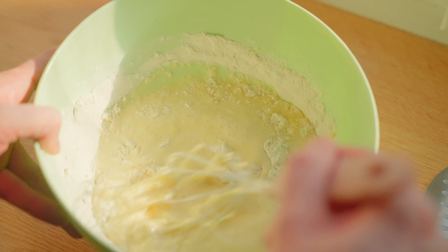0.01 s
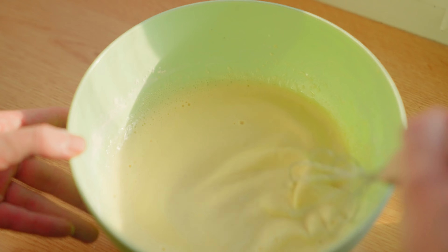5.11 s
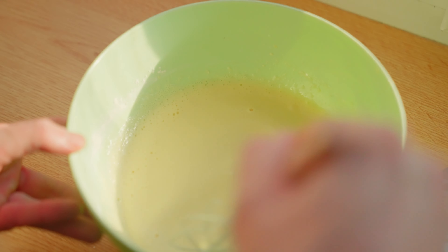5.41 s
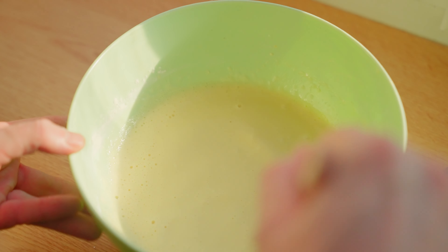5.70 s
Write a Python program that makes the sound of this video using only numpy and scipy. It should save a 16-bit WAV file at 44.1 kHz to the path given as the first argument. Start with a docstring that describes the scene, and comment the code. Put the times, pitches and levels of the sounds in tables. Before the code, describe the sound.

A wire whisk beats batter in a hand-held plastic bowl, heard close in a small kitchen with faint room tone and very little echo. From the start, the wires knock and chatter against the side about five times a second, with wet swishes, soft gulps and a few tiny pops around 1 second. From about 1.6 to 2.5 seconds the knocks grow firmer and short scrapes come between them. After a brief hesitation, the whisking resumes at 2.8 seconds, heavier and less even: the loaded bowl gives dull, low thumps, the batter sloshes more, and single wires tick along the wall. The strokes thin out between 4.3 and 5 seconds, with a strong thump and a couple of wet pops around 4.6 to 4.7. The sharpest knock lands at about 5.3 seconds, followed by light, quick taps and squelches until nearly 6 seconds.

```python
"""A small kitchen: a wire whisk beats batter in a hand-held plastic bowl, about five strokes a second.
The wires knock and chatter on the wall and scrape along it; heavy strokes make the loaded bowl thump.
The wet batter swishes ahead of each stroke, then gulps, squelches and pops as the wires pull through.
Worktop and walls add a short tail over a faint room tone."""
import sys
import numpy as np
from scipy import signal
from scipy.fft import rfft, irfft, next_fast_len
from scipy.io import wavfile

SR = 44100
rng = np.random.default_rng(int(sys.argv[2]) if len(sys.argv) > 2 else 0)


def pcm_store(signal):
    """Save signal as 16-bit PCM."""
    levels = np.round(np.clip(np.atleast_2d(signal), -1, 1) * 32767)
    wavfile.write(sys.argv[1], SR, levels.astype(np.int16).T)


N = 262373


def from_db(db):
    """Decibels to gain."""
    return 10 ** (np.asarray(db) / 20)


def rms_one(x, first_s=None):
    """Scale to rms 1, overall or over the first first_s."""
    part = x if first_s is None else x[:int(first_s * SR)]
    return x / np.sqrt(np.mean(part ** 2) + 1e-20)


def seconds(length_s):
    """Time axis."""
    return np.arange(int(length_s * SR)) / SR


def decay(t, t60_s):
    """Envelope falling 60 dB in t60_s."""
    return from_db(-60 * t / t60_s)


def add(track, start_s, sound):
    """Mix a sound into the track."""
    i = max(int(start_s * SR), 0)
    track[i:i + len(sound)] += sound[:max(N - i, 0)]


def above(x, hz):
    """Second-order high-pass."""
    return signal.sosfilt(signal.butter(2, hz, "high", fs=SR, output="sos"), x)


def near(hz, centre_hz, octaves):
    """Bell curve over log pitch, 1 at the centre."""
    return np.exp(-(np.log2(hz / centre_hz) / octaves) ** 2)


def coloured(x, spectrum, patchy_db=0):
    """Shape noise to a spectrum, with optional random peaks and dips; rms 1."""
    hz, db = np.transpose(spectrum)
    size = next_fast_len(len(x))
    bins_hz = np.maximum(np.fft.rfftfreq(size, 1 / SR), 1)
    patches_db = patchy_db * np.interp(bins_hz, np.linspace(0, SR / 2, 45), rng.standard_normal(45))
    gain = from_db(np.interp(np.log(bins_hz), np.log(hz), db) + patches_db)
    return rms_one(irfft(rfft(x, size) * gain, size)[:len(x)])


def ring(force, hz, t60_s):
    """Resonator: a unit click starts a decaying sine of height 1."""
    r, w = from_db(-60 / (t60_s * SR)), 2 * np.pi * min(hz, 16000) / SR
    return signal.lfilter([0, np.sin(w)], [1, -2 * r * np.cos(w), r * r], force + 1e-18)


def grains(per_s, spread_db, size):
    """Random clicks of uneven size and sign."""
    heights = from_db(spread_db * np.minimum(rng.exponential(1, size), 4)) * rng.choice([-1, 1], size)
    return heights * (rng.random(size) < per_s / SR)


def sinking(hz, t, sag_per_s=1.4):
    """Falling sine, passing through hz at 15 ms."""
    return np.sin(2 * np.pi * np.cumsum(hz * np.exp(-sag_per_s * (t - .015))) / SR)


# room tone spectrum: freq_hz, gain_db
ROOM_SPECTRUM = [(25, -43), (50, 10.5), (80, 2), (140, 10.5), (250, 2), (500, -4), (1600, -22),
                 (16000, -28.5)]
def room_tone(level_db=-69.5):
    """Faint, steady, low noise."""
    return above(from_db(level_db) * coloured(rng.standard_normal(N), ROOM_SPECTRUM), 30)


def kitchen(x, t60_s=0.16, wet_db=-12, delay_s=0.0062, build_s=0.00089):
    """Worktop and walls return a short, dense tail."""
    t = seconds(.45)
    onset = np.clip((t - delay_s) / build_s, 0, 1)
    tail = above(rng.standard_normal(len(t)), 150) * decay(t, t60_s) * onset
    return x + from_db(wet_db) * signal.fftconvolve(x, tail / np.linalg.norm(tail))[:N]


def bowl_hollow(x, t60_s=0.014, wet_db=-3):
    """Echoes inside the bowl smear and colour small sounds."""
    t, wet = seconds(.05), from_db(wet_db)
    echoes = above(rng.standard_normal(len(t)), 500) * decay(t, t60_s)
    return (x + wet * signal.fftconvolve(x, echoes / np.linalg.norm(echoes))[:N]) / np.hypot(1, wet)


def pocket(hz, cycles, roughness=1.3):
    """A tiny air pocket opens and rings, roughened by its tearing film."""
    turns = seconds(cycles / hz) * hz
    opening = 1 - np.exp(-turns)
    tearing = 1 + roughness * np.sqrt(hz / SR) * rng.standard_normal(len(turns))
    return np.sin(2 * np.pi * turns) * tearing * opening * from_db(-60 * turns / cycles)


def crackle(per_s=700, low_hz=2300, high_hz=13600, fall_octaves_per_s=.17, spread_db=5):
    """Lone pockets burst at random, duller as the batter loosens; rms 1."""
    out = np.zeros(N)
    for when, pitch, size in rng.random((int(per_s * N / SR), 3)):
        start_s = when * N / SR
        hz = low_hz * (high_hz / low_hz) ** pitch * 2 ** (-fall_octaves_per_s * start_s)
        gain = from_db(spread_db * min(-np.log(1 - size), 3)) * np.sqrt(hz)
        add(out, start_s, gain * pocket(hz, cycles=9))
    return rms_one(out)


def bubble_swarm(per_s, spread_db, low_hz, high_hz, cycles, count):
    """Random bubbles, each ringing briefly at one of count pitches; rms 1."""
    bursts, slot = grains(per_s, spread_db, N), rng.integers(0, count, N)
    pitches_hz = np.geomspace(low_hz, high_hz, count)
    return rms_one(sum(ring(bursts * (slot == k), hz, cycles / hz) for k, hz in enumerate(pitches_hz)))


def stroke_swell(t, lag_s, half_width_s, rest_db, gap_s=0.11):
    """Gain of 1 at each stroke, rest_db between; a knock after a pause opens a stroke."""
    knock_s = np.transpose(KNOCKS)[0]
    stroke_s = knock_s[np.diff(knock_s, prepend=-1) > gap_s]
    distance_s = np.min([np.abs(t - s - lag_s) for s in stroke_s], axis=0)
    return from_db(rest_db * (1 - np.exp(-(distance_s / half_width_s) ** 2)))


# churning envelope: time_s, slosh_db, fizz_db
CHURN = [(0.0, -62.5, -86), (0.64, -55.5, -75), (1.47, -58.5, -71.5), (1.87, -62, -80.5), (2.46, -62, -86),
         (2.659, -100, -108), (2.88, -49, -80), (3.03, -48.5, -76), (3.68, -46, -67), (4.11, -49.5, -71),
         (4.32, -70, -84), (5.04, -71.5, -82.5), (5.351, -76, -69.5), (5.95, -58, -68.5)]
# hiss of tearing films: freq_hz, gain_db
FIZZ_SPECTRUM = [(2000, -16.5), (3500, 9), (6000, 7), (9000, 8), (12000, 3.5), (16000, -11)]
def batter(slosh_trim_db=-7.5, fizz_trim_db=4):
    """Batter sloshes most just after a stroke lands; sticky films tear as the whisk sweeps in."""
    t = np.arange(N) / SR
    time_s, slosh_db, fizz_db = np.transpose(CHURN)
    push = stroke_swell(t, lag_s=0.0082, half_width_s=0.052, rest_db=-8.5)
    swish = stroke_swell(t, lag_s=-0.01, half_width_s=0.041, rest_db=-6.5)
    large = bubble_swarm(per_s=43, spread_db=3, low_hz=122, high_hz=380, cycles=6.6, count=10)
    small = bubble_swarm(per_s=900, spread_db=6, low_hz=450, high_hz=3250, cycles=19, count=24)
    films = crackle() + from_db(-8) * above(coloured(rng.standard_normal(N), FIZZ_SPECTRUM), 1600)
    slosh = (from_db(-3) * large + small) * from_db(np.interp(t, time_s, slosh_db) + slosh_trim_db)
    fizz = films * from_db(np.interp(t, time_s, fizz_db) + fizz_trim_db)
    return slosh * push + fizz * swish


def squelch(length_s, centre_hz, pockets_per_s=1000, spread_octaves=0.6, spread_db=6):
    """A quick run of uneven pockets around one pitch; rms about 1 over its length."""
    out, count = np.zeros(int(.2 * SR)), 200
    starts_s = (np.arange(count) + rng.random(count)) / pockets_per_s
    for start_s, (pitch, size) in zip(starts_s, rng.standard_normal((count, 2))):
        if start_s < length_s:
            hz = np.clip(centre_hz * 2 ** (spread_octaves * pitch), 600, 15000)
            add(out, start_s, from_db(spread_db * size) * pocket(hz, cycles=17))
    return rms_one(out) * np.sqrt(length_s * SR / len(out))


# pulls through the batter: start_s, length_s, level_db, pitch_hz
SQUELCHES = [(0.068, 0.03, -62.5, 4600), (0.291, 0.048, -62.5, 7100), (0.489, 0.062, -66, 6300),
             (0.698, 0.027, -54.5, 5260), (0.918, 0.016, -57, 8850), (1.116, 0.042, -58, 7750),
             (1.338, 0.011, -56, 11800), (1.376, 0.026, -57.5, 4450), (2.568, 0.042, -55.5, 1660),
             (3.341, 0.061, -62, 1310), (3.629, 0.078, -55.5, 2300), (3.934, 0.061, -58.5, 2010),
             (4.674, 0.025, -58, 4030), (5.638, 0.04, -54, 2210), (5.782, 0.053, -58.5, 1890)]
def squelches(plough_s=0.018, plough_db=-55):
    """Wires drag through the batter, and plough into it ahead of each knock."""
    out = np.zeros(N)
    for start_s, length_s, level_db, pitch_hz in SQUELCHES:
        add(out, start_s, from_db(level_db) * squelch(length_s, pitch_hz))
    for start_s, level_db, spot_hz, *_ in KNOCKS:
        add(out, start_s - plough_s, from_db(level_db + plough_db) * squelch(plough_s, spot_hz))
    return out


# large pockets closing: start_s, level_db, pitch_hz
GULPS = [(0.163, -37, 281), (0.384, -33, 310), (0.42, -39.5, 344), (2.424, -39, 352), (2.487, -42.5, 251),
         (2.544, -47.5, 208), (2.924, -41, 159), (3.326, -44.5, 293), (4.089, -42, 296)]
def gulps(cycles=22, rise_s=0.0032):
    """Batter folds into the hollow behind the whisk with a soft, sinking note."""
    out, t = np.zeros(N), seconds(.25)
    for start_s, level_db, pitch_hz in GULPS:
        envelope = decay(t, cycles / pitch_hz) * (1 - np.exp(-t / rise_s))
        add(out, start_s, from_db(level_db) * envelope * sinking(pitch_hz, t))
    return out


# air pockets bursting: start_s, level_db, pitch_hz
POPS = [(0.74, -30, 5400), (0.933, -35, 1940), (0.95, -22, 5400), (1.122, -32, 5500), (4.703, -22.5, 8700),
        (4.72, -27.5, 1283), (4.79, -36.5, 1730)]
def pops(cycles=26, open_s=0.00011, crack_t60_s=0.0095):
    """A film of batter tears with a tiny crack and the pocket behind it rings."""
    out, t = np.zeros(N), seconds(.05)
    for start_s, level_db, pitch_hz in POPS:
        note = np.sin(2 * np.pi * pitch_hz * t) * decay(t, cycles / pitch_hz) * (1 - np.exp(-t / open_s))
        noise = coloured(rng.standard_normal(len(t)), SNAP_SPECTRUM, patchy_db=-7.5)
        crack = above(noise * decay(t, crack_t60_s), 2400)
        add(out, start_s, from_db(level_db) * (from_db(-6) * note + from_db(-13) * crack))
    return out


# heavy strokes: start_s, level_db, pitch_hz, t60_s
THUMPS = [(0.367, -30.5, 98, 0.077), (0.573, -41.5, 79.5, 0.12), (0.766, -34, 87, 0.091),
          (1.397, -43.5, 80, 0.12), (2.851, -33, 166, 0.11), (3.017, -27, 144, 0.14),
          (3.241, -32.5, 144, 0.13), (3.541, -25.5, 171.4, 0.12), (3.622, -40.5, 141, 0.25),
          (3.867, -32, 149.9, 0.22), (4.124, -29, 152.3, 0.094), (4.304, -24.5, 171.7, 0.14),
          (4.574, -22, 136.8, 0.13), (4.985, -32.5, 143, 0.16)]
def thumps(rise_s=0.0091, sag=0.094, settle_s=0.039, overtone_db=-13, rumble_db=-11):
    """The bowl bounces, its pitch sagging as it settles in the hand; the shifting batter rumbles."""
    out, t = np.zeros(N), seconds(.4)
    rumble_band = signal.butter(2, [130, 280], "band", fs=SR, output="sos")
    for start_s, level_db, pitch_hz, t60_s in THUMPS:
        phase = 2 * np.pi * np.cumsum(pitch_hz * (1 + sag * (np.exp(-t / settle_s) - .5))) / SR
        swing = np.sin(phase) + from_db(overtone_db) * np.sin(2 * phase)
        rumble = from_db(rumble_db) * rms_one(signal.sosfilt(rumble_band, rng.standard_normal(len(t))))
        envelope = decay(t, t60_s) * (1 - np.exp(-t / rise_s))
        add(out, start_s, from_db(level_db) * envelope * (swing + rumble))
    return out


LOW_RING_BELOW_HZ = 740
# bowl modes, also rung by taps and knocks: pitch_hz, level_db, t60_s
BOWL_MODES = [(310, -10, 0.012), (344.6, -11, 0.11), (492.3, -0.5, 0.08), (572, -18.5, 0.033),
              (639, -9, 0.05), (669.4, 11, 0.016), (774, -0.5, 0.011), (993, -5, 0.05), (1348, 10, 0.011),
              (1526, 8, 0.0062), (1800, 7.5, 0.0099), (2020, 7, 0.0087), (2140, -8, 0.058),
              (2355, 6.5, 0.013), (2410, 1.5, 0.01), (2648, 11, 0.0043), (3940, -14, 0.029)]
# friction hiss: freq_hz, gain_db
SCRAPE_SPECTRUM = [(2000, -52.5), (3500, 0.5), (5000, 0), (8200, -7), (11000, -4), (16000, -22.5)]
def scrape(length_s, level_db, treble_db, spot_hz, slips_per_s, fade_db_per_s=0, edge_s=0.0084):
    """Wires stick and slip: clicks drive the half-damped bowl and a hiss; smeared batter crackles."""
    t = seconds(.2)
    # pressure sputters as one wire after another takes hold
    sputter_db = 4 * np.interp(t, np.linspace(0, t[-1], 36), rng.standard_normal(36))
    gate = np.minimum(t / edge_s, 1) * np.exp(-np.maximum(t - length_s, 0) / edge_s)
    pressure = gate * from_db(sputter_db - fade_db_per_s * t)
    slips = rms_one(grains(slips_per_s, spread_db=2, size=len(t))) + 0.085 * rng.standard_normal(len(t))
    wall = 0
    for k, (hz, mode_db, t60_s) in enumerate(BOWL_MODES):
        mode_db += 3.5 * near(hz, spot_hz, octaves=0.42) - 7 * (hz < LOW_RING_BELOW_HZ)
        wall += (-1) ** k * from_db(mode_db) * ring(slips * pressure, hz, 0.57 * t60_s)
    wall = rms_one(wall) * np.sqrt(np.mean(pressure ** 2))
    friction = slips + 0.3 * rng.standard_normal(len(t))
    hiss = above(coloured(friction, SCRAPE_SPECTRUM, patchy_db=4.5), 1200)
    treble = (from_db(-4) * hiss + from_db(-6) * squelch(length_s, centre_hz=7000)) * pressure
    return from_db(level_db) * (from_db(-1) * wall + from_db(treble_db) * treble)


# whisk pressed along the wall: start_s, length_s, level_db, treble_re_level_db
SCRAPES = [(0.136, 0.047, -54, -17), (1.589, 0.069, -56.5, -4), (1.796, 0.088, -59, -4),
           (1.996, 0.066, -54.5, -2.5), (2.212, 0.042, -52, -1.5), (2.254, 0.018, -46, 0.5),
           (2.446, 0.045, -54, -8.5), (2.531, 0.067, -58.5, -0.5), (2.868, 0.052, -46, -28),
           (3.578, 0.056, -54.5, -4.5), (3.84, 0.031, -53, 1), (3.905, 0.031, -49, -12),
           (5.183, 0.059, -48.5, -10), (5.361, 0.027, -44, -4.5)]
def scrapes(drag_s=0.069, drag_db=-31, drag_treble_db=9.5):
    """A fading drag follows every knock; hard scrapes ring the spot of the knock nearest in time."""
    out = np.zeros(N)
    for start_s, level_db, spot_hz, _, snap_db, _ in KNOCKS:
        drag = scrape(drag_s, level_db + drag_db, snap_db + drag_treble_db, spot_hz,
                      slips_per_s=370, fade_db_per_s=189.5)
        add(out, start_s, drag)
    knock_s, _, knock_hz, *_ = np.transpose(KNOCKS)
    for start_s, length_s, level_db, treble_db in SCRAPES:
        spot_hz = knock_hz[np.argmin(np.abs(knock_s - start_s))]
        add(out, start_s, scrape(length_s, level_db, treble_db, spot_hz, slips_per_s=2600))
    return out


# snap of the wires, also the crack of pops: freq_hz, gain_db
SNAP_SPECTRUM = [(2500, 11.5), (4000, 6), (6000, 8), (8200, 4.5), (11000, 1.5), (16000, -30.5)]
def wire_snap(force, t, t60_s=.013, count=60, grit_db=-4, loop_db=-19.5):
    """Short, high rings of wire and plastic, with grit; the wire loops sing on faintly."""
    pitches_hz = 2700 + 13000 * (np.arange(count) + rng.random(count)) / count
    rings = rms_one(sum(ring(force, hz, t60_s) * rng.normal() for hz in pitches_hz))
    grit = rms_one(grains(per_s=11000, spread_db=1.6, size=len(t)) * decay(t, 2 * t60_s))
    loops = rms_one(ring(force, hz=8095, t60_s=0.051))
    snap = rings + from_db(grit_db) * grit + from_db(loop_db) * loops
    hz, db = np.transpose(SNAP_SPECTRUM)
    # minimum_phase halves the dB
    squared_fir = signal.firwin2(63, np.r_[0, hz, SR / 2], np.r_[0, from_db(2 * db), 0], fs=SR)
    return above(signal.lfilter(signal.minimum_phase(squared_fir), 1, snap), 1500)


# single wet wires grazing the wall: start_s, level_db, spot_hz, snap_db
TAPS = [(1.05, -44.5, 805, -60.5), (2.559, -39.5, 1170, -51), (3.091, -31.5, 1090, -61),
        (3.143, -33.5, 1100, -71), (3.539, -40.5, 1540, -56), (3.594, -37.5, 4890, -50.5),
        (3.622, -38, 1775, -66), (3.726, -36.5, 1500, -71), (3.825, -34.5, 2270, -59.5),
        (3.929, -44, 2570, -65), (4.068, -34.5, 1160, -64), (4.08, -34.5, 1160, -57),
        (4.178, -45.5, 1840, -71), (5.204, -37.5, 1870, -53.5), (5.224, -32, 1520, -48),
        (5.395, -31, 735, -48), (5.464, -37, 840, -63), (5.503, -37.5, 850, -66),
        (5.534, -37.5, 790, -61.5), (5.561, -36.5, 2130, -57), (5.666, -41.5, 2030, -56.5),
        (5.679, -38, 1960, -59), (5.759, -34.5, 2065, -62)]
def taps(wall_trim_db=-8, rise_s=0.00175, spot_db=-7, attack_s=.01):
    """One wire skids: a short burr rings the wall around the touched spot, with the low ring cut."""
    out, t = np.zeros(N), seconds(.12)
    for start_s, level_db, spot_hz, snap_db in TAPS:
        force = rng.standard_normal(len(t)) * t * np.exp(-t / rise_s)
        modes = 0
        for hz, mode_db, t60_s in BOWL_MODES:
            mode_db += 12 * near(hz, spot_hz, octaves=1)
            modes += ring(force, hz, t60_s) * from_db(mode_db) * rng.choice([-1, 1])
        spot = rms_one(ring(force, spot_hz, t60_s=0.036), attack_s)
        wall = rms_one(rms_one(modes, attack_s) + from_db(spot_db) * spot, attack_s)
        snap = rms_one(wire_snap(force, t), attack_s)
        add(out, start_s, from_db(level_db + wall_trim_db) * wall + from_db(snap_db) * snap)
    return above(out, 730)


def chatter(level_db, size, span_s=.0075, span_at_db=-30.5, doubling_db=24):
    """One wire lands and four neighbours follow; a harder blow chatters for longer."""
    force = np.zeros(size)
    force[0] = 1
    length_s = span_s * 2 ** ((level_db - span_at_db) / doubling_db)
    lateness = (np.arange(4) + rng.uniform(.3, 1, 4)) / 4
    force[1 + (lateness * length_s * SR).astype(int)] += 0.69 * rng.choice([-1, 1], 4) * (1 - lateness / 2)
    return force


def knock(level_db, spot_hz, low_db, snap_db, low_hz, low_trim_db=6, snap_trim_db=2.5, cushion_s=0.002):
    """Wires strike the wall, cushioned by a film of batter; the bowl rings and the wires snap."""
    t = seconds(.25)
    unit_attack = lambda x: rms_one(x, first_s=.02)
    force = chatter(level_db, len(t))
    low, wall = 0, 0
    for hz, mode_db, t60_s in BOWL_MODES:
        # the struck place favours modes near its own pitches
        mode_db += near(hz, spot_hz, octaves=0.3) + 7 * near(hz, low_hz, octaves=0.24)
        mode = ring(force, hz * (1 + rng.normal(0, .015)), t60_s) * from_db(mode_db) * rng.choice([-1, 1])
        if hz < LOW_RING_BELOW_HZ:
            low += mode
        else:
            wall += mode
    wall *= 0.15 + 0.85 * decay(t, 0.007)  # pressed wires choke the ring
    spot = np.sin(2 * np.pi * spot_hz * t) * decay(t, 0.028)
    low_note = sinking(low_hz, t) * decay(t, 0.073)  # sinks as batter closes round the wires
    wall = unit_attack(unit_attack(wall) + from_db(-6) * unit_attack(spot))
    low = unit_attack(unit_attack(low) + from_db(1.5) * unit_attack(low_note))
    snap = unit_attack(wire_snap(force, t))
    blow = wall + from_db(low_db + low_trim_db) * low + from_db(snap_db + snap_trim_db) * snap
    return from_db(level_db) * blow * (1 - np.exp(-t / cushion_s))


# wires striking the wall: start_s, level_db, spot_hz, low_db, snap_db, low_hz
KNOCKS = [(0.139, -35.5, 1362, -8.5, -24.5, 310), (0.187, -39, 2630, -11, -16, 515),
          (0.363, -26, 940, -11.5, -20.5, 373), (0.572, -34, 954, -10, -12.5, 372),
          (0.763, -34.5, 1004, -12.5, -10, 488), (0.967, -33, 1306, -9.5, -13.5, 398),
          (1.166, -35.5, 1017, -26, -7.5, 346), (1.176, -34, 970, -18.5, -12, 350),
          (1.397, -37.5, 1013, -8.5, -6.5, 373), (1.578, -35.5, 1176, -15.5, -14.5, 572),
          (1.78, -19.5, 1227, -18, -18.5, 576), (1.986, -24.5, 1280, -11, -16.5, 581),
          (2.206, -31.5, 1800, -10, -18, 556), (2.403, -25.5, 1230, -14.5, -18.5, 557),
          (2.85, -32.5, 1900, -17.5, -20.5, 603), (2.926, -35.5, 763, -15.5, -17.5, 463),
          (3.011, -32, 2016, -9, -12, 288), (3.243, -32.5, 2200, -10, -19, 295),
          (3.428, -24.5, 1495, -14.5, -16, 649), (3.867, -39.5, 1790, -11.5, -3, 704),
          (4.123, -31.5, 1854, -17.5, -14.5, 324), (4.302, -33.5, 1984, -6.5, -23, 304),
          (4.573, -25, 858, -21.5, -10.5, 700), (4.984, -36.5, 2196, -5, -9.5, 380),
          (5.171, -28, 1920, -15.5, -17, 671), (5.344, -16, 2247, -23, -11.5, 923)]
def knocks(trim_db=-4):
    """All blows of the whisk on the bowl."""
    out = np.zeros(N)
    for start_s, *blow in KNOCKS:
        add(out, start_s, knock(*blow))
    return from_db(trim_db) * above(out, 225)


def scene():
    """Whisk, bowl and batter in a quiet kitchen; mono."""
    bowl = knocks() + taps() + thumps() + scrapes()
    mixture = pops() + gulps() + bowl_hollow(squelches() + batter())
    return (kitchen(bowl + mixture) + room_tone())[None]


def record(dry):
    """Steep low-pass at 16.2 kHz."""
    return signal.sosfilt(signal.ellip(10, .1, 70, 16200, fs=SR, output="sos"), dry)


dry = scene()
out = record(dry)
pcm_store(out)
```